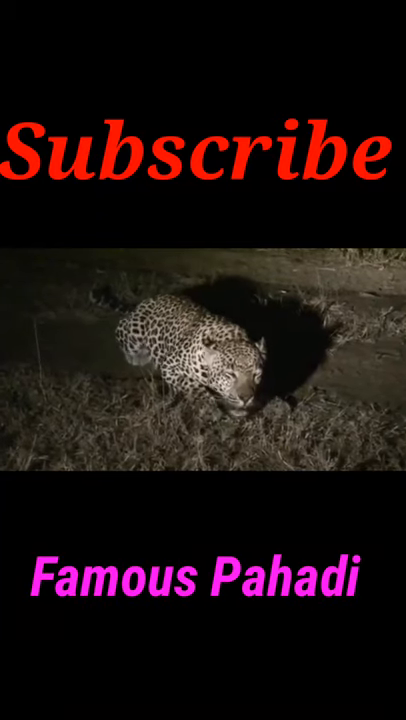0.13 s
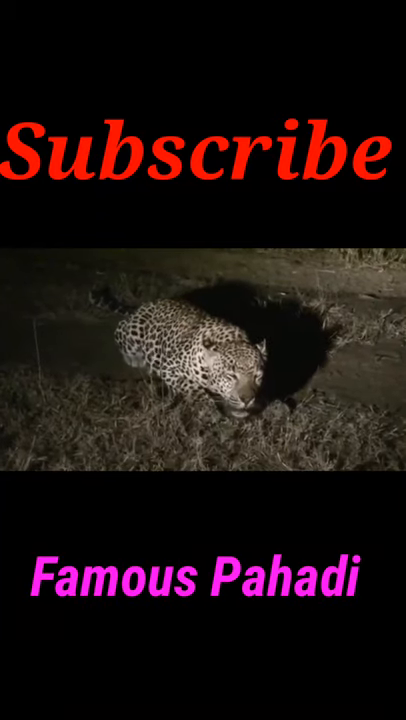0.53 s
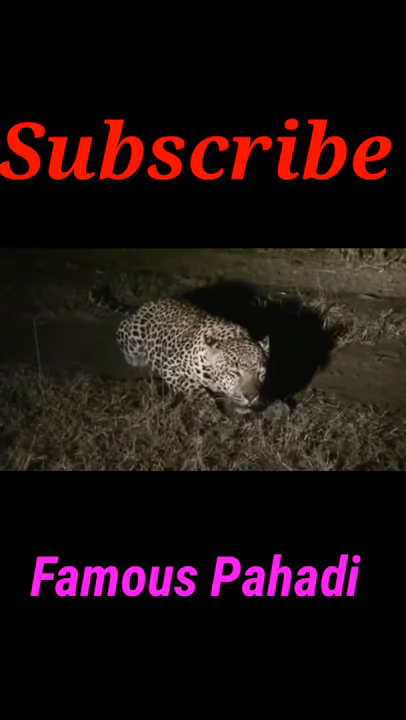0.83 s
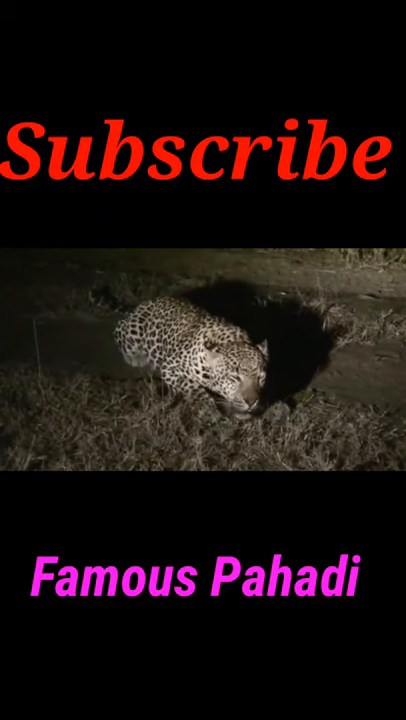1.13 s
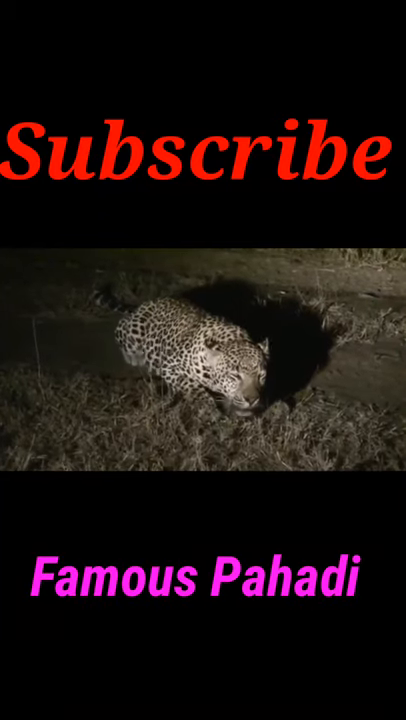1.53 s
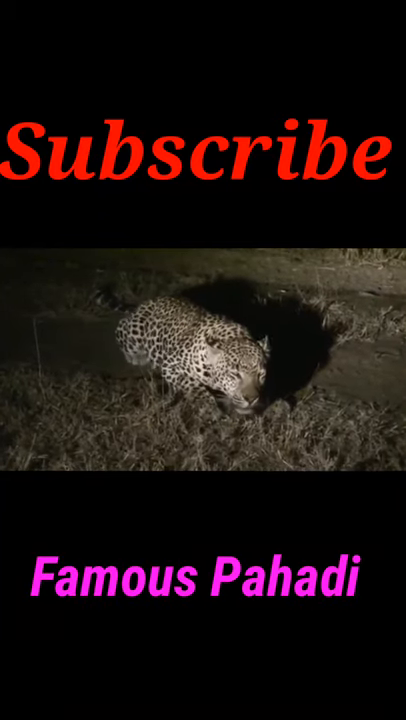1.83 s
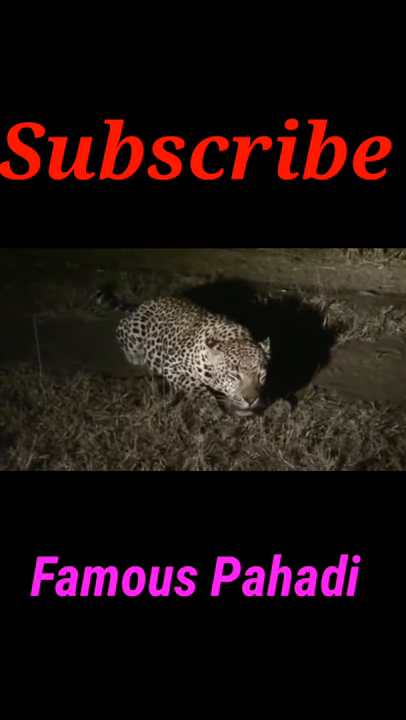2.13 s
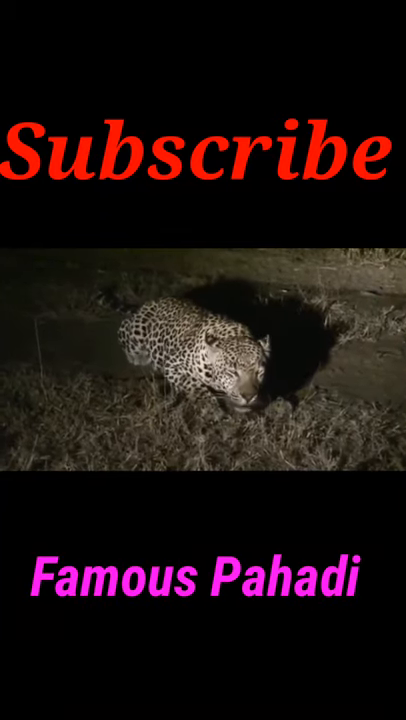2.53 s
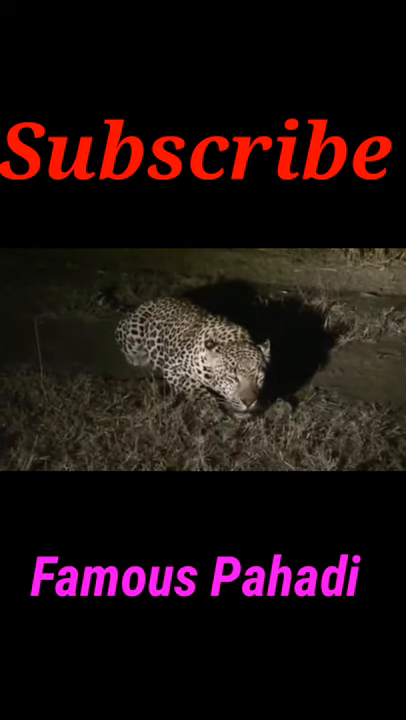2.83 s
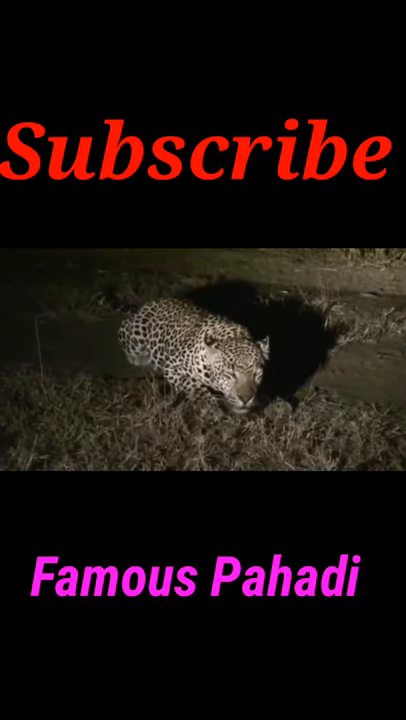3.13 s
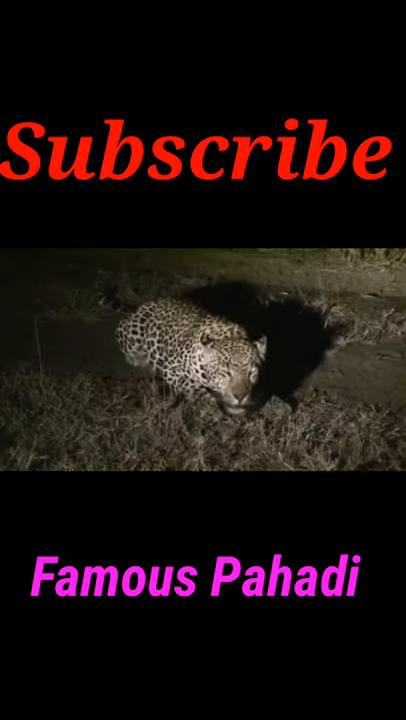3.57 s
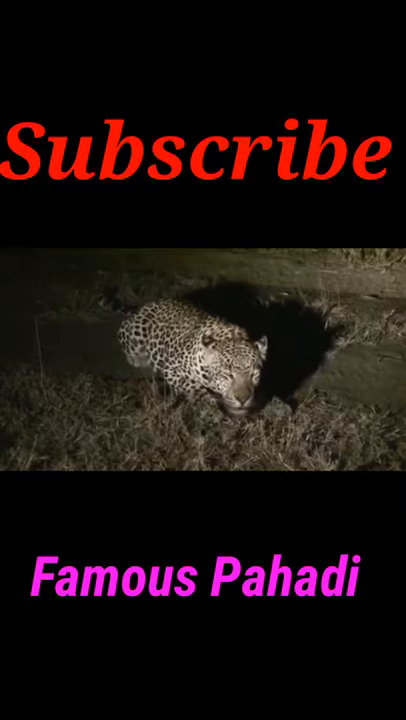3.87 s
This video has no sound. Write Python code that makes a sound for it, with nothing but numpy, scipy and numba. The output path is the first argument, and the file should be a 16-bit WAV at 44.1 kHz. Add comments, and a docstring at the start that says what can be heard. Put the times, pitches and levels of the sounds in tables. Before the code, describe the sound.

A leopard calls close by at night in hoarse, sawing in-and-out rasps that gradually fade

```python
"""Hoarse sawing strokes, in and out, come from close by and fade: a leopard calls at night a few metres away.
Each breath makes slack vocal folds slap slowly and unevenly; the slaps, flutter and voicing ring chest and throat.
Air rasps past through drifting upper resonances, and a lone slap comes as each breath in begins.
Reflections, a short tail and faint night air surround the cat. Overload flattens the loud strokes."""
import sys
import numpy as np
from scipy import signal
from scipy.fft import rfft, irfft
from scipy.io import wavfile
from scipy.ndimage import uniform_filter1d
from numba import njit

SR = 44100
rng = np.random.default_rng(int(sys.argv[2]) if len(sys.argv) > 2 else 0)


def voltage_ratio(decibels):
    """Convert decibels (scalar or array-like) to amplitude ratios, 20 dB per decade."""
    exponent = np.asarray(decibels, float) / 20
    return 10 ** exponent


def generate_wav(sig):
    """Save sig (samples, or channels by samples) to the path in sys.argv[1] as 16-bit PCM at SR."""
    pcm = np.round(np.clip(np.atleast_2d(sig).T, -1, 1) * 32767).astype(np.int16)
    wavfile.write(sys.argv[1], SR, pcm)


N = 176400


@njit
def moving_bandpass(x, hz, width):
    """State-variable band-pass with a moving centre and gain 1 at that centre."""
    y, band_state, low_state = np.empty(len(x)), 0., 0.
    for i in range(len(x)):
        g, k = np.tan(np.pi * hz[i] / SR), width / hz[i]
        v = (band_state + g * (x[i] - low_state)) / (1 + g * (g + k))
        band_state, low_state, y[i] = 2 * v - band_state, 2 * (low_state + g * v) - low_state, k * v
    return y


def resonance(x, hz, width):
    """Two band-passes in series give dark skirts; the first brings unit white noise near rms 1."""
    hz = hz * np.ones(N)
    first = moving_bandpass(x, hz, 1. * width) * np.sqrt(SR / (np.pi * width))
    return moving_bandpass(first, hz, 1.35 * width)  # the second pass is wider


def walk(rate_hz):
    """Slow random drift with spread 1: held random values, smoothed twice."""
    n = int(SR / rate_hz)
    held = np.repeat(rng.standard_normal(N // n + 1), n)[:N]
    w = uniform_filter1d(uniform_filter1d(held, n), n)
    return w / w.std()


# Fade-out of the whole sound: t/s, gain/1
FADE_OUT = [(0, 1.0), (1.12, 1.0), (1.8, .78), (2.35, .6), (3.0, .4), (3.7, .215), (4.0, .1)]


def ceiling():
    """Gain of the fade-out at every sample, which is also the overload ceiling."""
    return np.interp(np.arange(N) / SR, *np.array(FADE_OUT).T)


NIGHT_DB = -38.5  # rms before the fade

# Spectral colour of the night air: f/Hz, relative level per Hz/dB
NIGHT_COLOUR = [(24, -40), (40, 2.5), (184, -2), (319, -16.5), (637, -14), (4400, -34), (12000, -41),
                (15600, -74), (22000, -120)]


def night():
    """Faint night air: shaped noise, different at each ear, under the fade."""
    hz, db = np.array(NIGHT_COLOUR).T
    bins_hz = np.fft.rfftfreq(N, 1 / SR)
    shape = voltage_ratio(np.interp(np.log(bins_hz + 1), np.log(hz), db))
    air = irfft(rfft(rng.standard_normal((2, N))) * shape, N)
    return voltage_ratio(NIGHT_DB) * air / air.std() * ceiling()


ECHO_LOW_CUT_HZ, TAIL_T60_S, TAIL_DB = 396, 0.41, -19.5  # tail level: its whole energy

# Ground and bush reflections: t/s (delay), left level/dB, right level/dB
REFLECTIONS = [(.0023, -13, -24), (.0051, -22, -24.5), (.0094, -36, -29), (0.016, -11.5, -13.5),
               (.027, -10.5, -13)]


def outdoors(cat):
    """Separate reflections and a decaying noise tail, both thinned in the bass."""
    t = np.arange(SR // 2) / SR
    space = rng.standard_normal((2, len(t))) * voltage_ratio(-60 * t / TAIL_T60_S) * (t > .01)
    space *= voltage_ratio(TAIL_DB) / np.sqrt((space ** 2).sum(axis=1, keepdims=True))
    for delay_s, left_db, right_db in REFLECTIONS:
        space[:, int(delay_s * SR)] += voltage_ratio(np.array([left_db, right_db]))
    bright = signal.lfilter(*signal.butter(1, ECHO_LOW_CUT_HZ, "high", fs=SR), cat)
    return signal.fftconvolve(space, bright[None], axes=1)[:, :N]


CRACKLE_PER_S, CRACKLE_DB, CRACKLE_S = 350, 1.6, .003  # jump rate, mean jump gain, decay time


def crackle():
    """Spit and loose tissue roughen the air: gain jumps at random moments, dying away in milliseconds."""
    jumps = (rng.random(N) < CRACKLE_PER_S / SR) * voltage_ratio(CRACKLE_DB * rng.exponential(size=N))
    decay = np.exp(-1 / (CRACKLE_S * SR))
    return 0.95 + signal.lfilter([1], [1, -decay], np.minimum(jumps, 12))


RASP_DB, RASP_FLICKER_DB = -6, 2
RASP_GRAIN_DB = 4.5  # how unevenly a slap reaches each band
RASP_STEADY, RASP_DRIFT = 0.5, 0.03  # gain between slaps; drift as a share of the centre
DULL_ABOVE_HZ = 3800  # dulling is full one octave up
DULL_UNDER_DB, DULL_SLOPE = -35, .4  # flow where dulling starts; dB lost per dB of flow

# Upper resonances that colour the rasping air: f/Hz, width/Hz (first pass), level/dB
RASP_BANDS = [(2100, 900, -3), (2717, 1240, -.6), (3580, 650, .6), (4440, 410, -10), (4920, 230, -9.5),
              (5980, 1300, -19), (7770, 710, -15), (11040, 3800, -14), (14000, 1500, -30.5)]


def rasp(air, push):
    """Turbulent air through drifting upper resonances, each with its own grain; weak air is duller."""
    weak_db = np.minimum(20 * np.log10(air / ceiling() + 1e-9) - DULL_UNDER_DB, 0)
    noise, out = air * voltage_ratio(RASP_DB) * rng.standard_normal(N), 0
    for hz, width, db in RASP_BANDS:
        grain = (RASP_STEADY + push * voltage_ratio(RASP_GRAIN_DB * walk(60))) * crackle()
        octave_share = min(max(np.log2(hz / DULL_ABOVE_HZ), 0), 1)
        dull_db = DULL_SLOPE * octave_share * weak_db
        level = voltage_ratio(db + dull_db + RASP_FLICKER_DB * walk(34.88))
        out = out + resonance(noise * grain * level, hz * (1 + RASP_DRIFT * walk(11)), width)
    return out


THROAT_DRIFT = 0.037  # share of the centre

# Low body resonances: f/Hz, width/Hz (first pass), level re chest/dB for breath in, the same for breath out
BODY_MODES = [(56.7, 16, -15, -28.5), (93.3, 16, -22.5, -21.5), (135, 25, -7, -22),
              (298.7, 22, -17.5, -27.5)]


def chest_and_body(source, chest, chest_width, way):
    """Chest rings with body modes whose pitches drift slightly; modes above its rest pitch have reversed sign."""
    low = resonance(source, chest * (1 + THROAT_DRIFT * walk(30)), chest_width)
    for row in BODY_MODES:
        mode = resonance(source, row[0] * (1 + THROAT_DRIFT * walk(20)), row[1])
        low = low + np.sign(IN_CHEST[0] - row[0]) * voltage_ratio(row[way]) * mode
    return low


MOUTH_DB, PATCHY_DB = 1.5, 1  # mouth gain; how unevenly the source reaches each throat resonance

# Upper throat resonances: f/Hz, width/Hz (first pass), level/dB for breath in, level/dB for breath out
THROAT_MODES = [(510, 70, -12, -9), (840, 90, -8, -8), (1050, 160, -24, -17), (1360, 100, -16, -16),
                (1650, 70, -23, -23)]


def throat(source, chest, mouth, opening, chest_width, mouth_width, way):
    """Chest, body, mouth and throat ring; throat neighbours of opposite sign keep the valleys dark."""
    low = chest_and_body(source, chest, chest_width, way)
    upper = source * voltage_ratio(opening)
    out = low + voltage_ratio(MOUTH_DB) * resonance(upper, mouth, mouth_width)
    for k, row in enumerate(THROAT_MODES):
        patchy = upper * voltage_ratio(PATCHY_DB * walk(45))
        mode = resonance(patchy, row[0] * (1 + THROAT_DRIFT * walk(20)), row[1])
        out = out + (-1) ** k * voltage_ratio(row[way]) * mode
    return out


# Lone slap of the folds as a breath in begins: t/s, level/dB (drive), mouth opening/dB
LONE_SLAPS = [(0.02, -21.5, -2), (0.422, -13.5, -9), (0.906, -18.5, -14), (1.477, -15.5, -10),
              (2.043, -25.5, -6.5), (2.615, -23.5, -23), (3.266, -28.5, -17)]


def first_slaps():
    """Single clicks into the nearly closed throat, ringing a slightly drifting chest and a steady mouth."""
    clicks, opening = np.zeros(N), np.zeros(N)
    for s, db, open_db in LONE_SLAPS:
        at = int(s * SR)
        clicks[at], opening[at] = 12 * voltage_ratio(db), open_db
    return throat(clicks, chest=159, mouth=610, opening=opening, chest_width=40, mouth_width=39, way=2)


def controls(breaths):
    """On switch, level dB, mouth Hz, mouth opening dB and air dB for every sample."""
    t, rows = np.arange(N) / SR, np.vstack(breaths)
    on = sum((t >= b[0][0]) & (t < b[-1][0]) for b in breaths)
    curves = [np.interp(t, rows[:, 0], rows[:, k]) for k in range(1, 5)]
    return [uniform_filter1d(1. * on, size=200)] + curves


def arch(breaths, rest_hz, shift_hz, turn_s):
    """Chest resonance leaves its rest with each breath, turns, and drifts back."""
    t, starts = np.arange(N) / SR, np.array([b[0][0] for b in breaths])
    latest = np.maximum(np.searchsorted(starts, t) - 1, 0)
    u = np.maximum(t - starts[latest], 0) / turn_s
    return rest_hz + shift_hz * u * np.exp(1 - u)


def slaps(breaths, rate_hz, scatter, size_db):
    """Uneven slaps, restarting with each breath: click train near unit power, cycle phase and size."""
    clicks, phase, size = np.zeros(N), np.ones(N), np.ones(N)
    for b in breaths:
        chance = rng.standard_normal((40, 2))
        periods = np.exp(scatter * chance[:, 0]) / rate_hz
        edges = ((b[0][0] + .006 + np.cumsum(np.r_[0, periods])) * SR).astype(int)
        for start, end, s in zip(edges, edges[1:], voltage_ratio(size_db * chance[:, 1])):
            if start < min(b[-1][0] * SR, N - 1):
                n = min(end, N) - start
                clicks[start] = s * np.sqrt(SR / rate_hz)
                phase[start:start + n] = np.arange(n) / (end - start)
                size[start:start + n] = s
    return clicks, phase, size


VOICED_FROM_DB, VOICED_RANGE_DB = -28.5, 6  # stroke level re ceiling where voicing starts; span to full
VOICED_JITTER = 0.054  # share of the pitch


def voiced(chest, level_db):
    """In all but weak strokes the folds also voice at the chest resonance: jittered pulses enter with level."""
    cycles = np.floor(np.cumsum(chest * (1 + VOICED_JITTER * walk(40))) / SR)
    under_ceiling_db = level_db - 20 * np.log10(ceiling())
    share = np.clip((under_ceiling_db - VOICED_FROM_DB) / VOICED_RANGE_DB, 0, 1)
    return share * np.diff(cycles, prepend=0) * np.sqrt(SR / chest)


FLUTTER_GATE, VOICED_GATE, RASP_GATE = 0.93, 3.1, 0.25  # decay after a slap, in slap cycles
PUSH_RISE_S = .003  # rise of the air around a slap


def breath(breaths, folds, chest_hz, way):
    """Slaps, flutter noise and voicing ring the throat; also returns air flow and its push around each slap."""
    rate_hz, scatter, size_db, flutter_db, voiced_db, chest_width, mouth_width = folds
    on, level_db, mouth, opening, air_db = controls(breaths)
    chest = arch(breaths, *chest_hz)
    clicks, phase, size = slaps(breaths, rate_hz, scatter, size_db)
    flutter = voltage_ratio(flutter_db) * size * np.exp(-phase / FLUTTER_GATE) * rng.standard_normal(N)
    voice = voltage_ratio(voiced_db) * np.exp(-phase / VOICED_GATE) * voiced(chest, level_db)
    source = on * voltage_ratio(level_db) * (clicks + flutter + voice)
    call = throat(source, chest, mouth, opening, chest_width, mouth_width, way)
    push = uniform_filter1d(on * size * np.exp(-phase / RASP_GATE), int(PUSH_RISE_S * SR))
    return call, on * voltage_ratio(air_db), push


# Breaths in, one list each: t/s, level/dB (drive, fade included), mouth f/Hz, mouth opening/dB, air drive/dB
BREATHS_IN = [
    [(0.02, -43, 566, -15, -46), (0.042, -11.5, 556, -7.5, -38.5), (0.062, -12.5, 572, -8, -36.5),
     (0.094, -11, 620, -9.5, -37.5), (0.1, -3, 630, -14.5, -22.5), (0.112, -16.5, 566, -1, -34),
     (0.142, -11.5, 540, -14, -31.5), (0.164, -20.5, 593, -7, -66), (0.175, -16, 580, -21.5, -32)],
    [(0.435, -26, 634, -10, -43), (0.441, -19, 616, -15, -37.5), (0.453, -20.5, 616, -1, -41),
     (0.463, -19, 615, -1.5, -35.5), (0.529, -7.5, 556, -10.5, -34.5), (0.545, -5.5, 554, -13.5, -33.5),
     (0.603, -14.5, 554, -7, -36.5), (0.643, -25, 562, -23, -59.5), (0.655, -35, 584, -15.5, -47)],
    [(0.94, -32.5, 624, 1, -42.5), (0.96, -12, 570, -11, -40), (0.978, -15, 616, -18.5, -30.5),
     (1.008, -10.5, 610, -6.5, -37), (1.078, -8.5, 557, -11, -32.5), (1.122, -15.5, 547, -4, -36.5),
     (1.14, -17, 614, -9, -41), (1.16, -24, 570, -4.5, -68.5), (1.175, -22, 590, -16, -38.5)],
    [(1.515, -13.5, 622, -12, -46), (1.531, -19, 610, -5, -37), (1.551, -7, 630, -20, -34.5),
     (1.575, -11, 610, -14, -38.5), (1.595, -15, 610, -11.5, -34.5), (1.643, -11, 543, -4, -40),
     (1.673, -18, 610, -8, -35), (1.705, -42, 543, -2, -53), (1.725, -40, 580, -2, -67.5)],
    [(2.06, -24, 640, -13.5, -51), (2.102, -17.5, 560, -8.5, -42.5), (2.116, -15, 626, -16.5, -47),
     (2.184, -8.5, 608, -15.5, -36.5), (2.234, -21, 560, -3, -39.5), (2.266, -25.5, 590, -7, -49),
     (2.294, -42, 590, 1, -70), (2.305, -38, 580, -25, -73)],
    [(2.66, -43, 636, -8, -66), (2.682, -33.5, 580, -1, -50.5), (2.702, -19.5, 644, -20, -44.5),
     (2.732, -21.5, 654, -3.5, -48), (2.742, -20, 550, -12, -43), (2.846, -16.5, 594, -9, -43.5),
     (2.872, -26, 566, -14.5, -44), (2.908, -41, 590, -4, -89), (2.925, -35, 555, -19, -77)],
    [(3.335, -48, 610, -31, -79), (3.345, -30, 630, -7, -59.5), (3.371, -21.5, 606, -31, -46),
     (3.385, -25, 630, -14, -51), (3.405, -27.5, 573, -9.5, -49), (3.543, -20.5, 566, -13.5, -48),
     (3.587, -36.5, 540, -6.5, -54.5), (3.599, -46, 583, -15, -80), (3.625, -41, 590, -23, -75)],
]
# Folds on the way in: slap rate f/Hz, period scatter/1 (log), size scatter/dB, flutter level/dB, voiced level/dB,
# chest width/Hz, mouth width/Hz (first pass)
FOLDS_IN = (48, 0.28, 2, -0.5, -10, 46.5, 55)
# Chest resonance on the way in: rest f/Hz, shift at the turn/Hz, turn t/s
IN_CHEST = (172, -20, .15)


def breath_in():
    """Drawn breath: slack folds slap while the chest resonance dips and returns."""
    return breath(BREATHS_IN, FOLDS_IN, IN_CHEST, way=2)


# Breaths out, one list each: t/s, level/dB (drive, fade included), mouth f/Hz, mouth opening/dB, air drive/dB
BREATHS_OUT = [
    [(0.18, -1, 580, -7.5, -37), (0.2, 0.5, 650, -17, -21.5), (0.22, -5.5, 619, 2, -30),
     (0.244, -12, 620, -9, -33.5), (0.258, -18, 586, -16, -35), (0.284, -13.5, 610, -10, -41),
     (0.334, -36.5, 614, -5, -42.5), (0.364, -27.5, 594, -13.5, -78), (0.39, -29, 630, -13, -43)],
    [(0.655, -9.5, 630, -17.5, -35), (0.678, 1, 600, -6.5, -32), (0.692, -7, 640, 0, -30),
     (0.698, -10, 590, -9, -32.5), (0.745, -6, 620, -3, -29), (0.82, -19, 617, -12, -37.5),
     (0.848, -15.5, 557, -16, -44.5), (0.872, -49, 610, -11, -64), (0.89, -56, 640, 11, -43.5)],
    [(1.18, -26, 630.7, -20, -36), (1.188, -16.5, 646, -4, -39.5), (1.206, -9, 680, 4, -30),
     (1.226, -0.5, 615, -7, -31.5), (1.258, -5, 621, -3, -28.5), (1.382, -20, 610, -20.5, -46),
     (1.404, -35.5, 630, -1, -45), (1.434, -45, 626, -18, -66), (1.45, -57, 650, 21, -50)],
    [(1.735, -20, 600, -17, -53), (1.757, -4, 643, -7, -31.5), (1.789, -4, 663, -12, -38),
     (1.797, -10, 583, 2, -28.5), (1.835, -10, 653, -6.5, -37.5), (1.935, -19.5, 580, -20, -42.5),
     (1.963, -32.5, 598, -5, -50), (1.995, -43.5, 566, -12, -88), (2.01, -43, 630, -15.5, -66)],
    [(2.31, -39, 628.2, -14.5, -57.5), (2.316, -16.5, 685, -10.5, -41), (2.338, -1, 610, -14.5, -36.5),
     (2.396, -18.5, 590, 4, -36), (2.448, -16.5, 634, -15, -41.5), (2.498, -20.5, 617, -12.5, -44.5),
     (2.518, -42, 600, -19, -56.5), (2.532, -34.5, 600, -9, -47.5), (2.59, -72, 616, 7, -82)],
    [(2.93, -17, 643, -17, -48), (2.95, -16.5, 666, -7, -40), (2.972, -9.5, 636, -8, -36),
     (3.012, -21, 566, 2, -40), (3.052, -21, 620, -5.5, -44.5), (3.104, -24.5, 574, -17.5, -45),
     (3.148, -28.5, 577, -11, -46.5), (3.194, -77, 610, -6, -61.5), (3.23, -64, 625, -11, -79)],
    [(3.63, -35, 645, -18, -67), (3.638, -23, 633, -26.5, -56), (3.652, -21.5, 635, -2, -47),
     (3.704, -20.5, 570, -5.5, -46.5), (3.724, -31.5, 579, 1, -45), (3.762, -33, 574, -22, -50.5),
     (3.834, -36, 616, -12, -55.5), (3.892, -63, 608, -6, -64), (3.97, -61.5, 610, -12, -88)],
]
# Folds on the way out: slap rate f/Hz, period scatter/1 (log), size scatter/dB, flutter level/dB, voiced level/dB,
# chest width/Hz, mouth width/Hz (first pass)
FOLDS_OUT = (50, 0.56, 0.5, -2.5, -5, 52, 50)
# Chest resonance on the way out: rest f/Hz, shift at the turn/Hz, turn t/s
OUT_CHEST = (150, 45, .055)


def breath_out():
    """Pushed breath: more unevenly timed slaps while the chest resonance rises and falls back."""
    return breath(BREATHS_OUT, FOLDS_OUT, OUT_CHEST, way=3)


LEFT_DB, LEFT_UP_TO_HZ = 3.5, 1803  # left over right, in the lows
RASP_SPREAD = 0.3  # share of rasp in opposite sign at the two ears


def scene():
    """The cat a little to the left, with reflections, a short outdoor tail and night air."""
    call_in, air_in, push_in = breath_in()
    call_out, air_out, push_out = breath_out()
    flow = air_in + air_out, push_in + push_out
    cat = call_in + call_out + first_slaps() + rasp(*flow)
    lows = signal.lfilter(*signal.butter(1, LEFT_UP_TO_HZ, fs=SR), cat)
    apart = RASP_SPREAD * rasp(*flow)
    left = cat + (voltage_ratio(LEFT_DB / 2) - 1) * lows + apart
    right = cat + (voltage_ratio(-LEFT_DB / 2) - 1) * lows - apart
    return np.array([left, right]) + outdoors(cat) + night()


def roll_off(x):
    """The treble ends steeply here."""
    return signal.sosfilt(signal.butter(12, 16180, fs=SR, output="sos"), x)


KNEE = 14  # hardness of the overload


def record(dry):
    """Overload flattens the peaks before the fade, so the ceiling sinks with the fade."""
    mix = dry / (1 + np.abs(dry / ceiling()) ** KNEE) ** (1 / KNEE)
    return roll_off(mix)


dry = scene()
out = record(dry)
generate_wav(out)
```